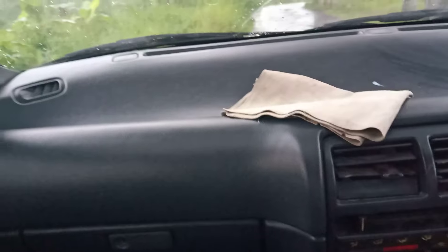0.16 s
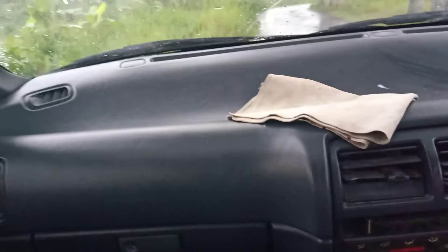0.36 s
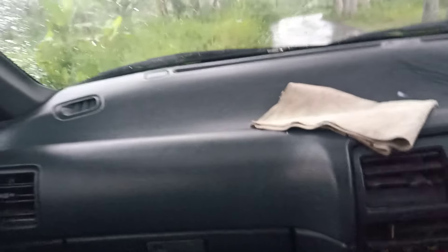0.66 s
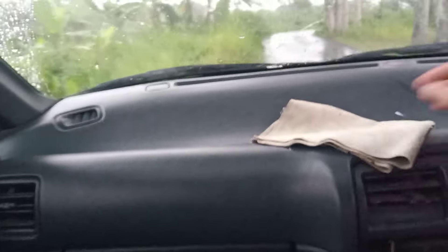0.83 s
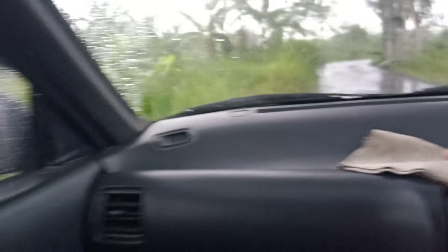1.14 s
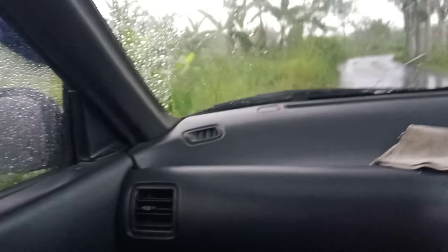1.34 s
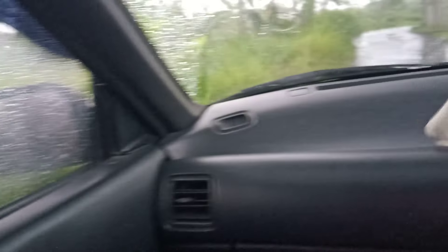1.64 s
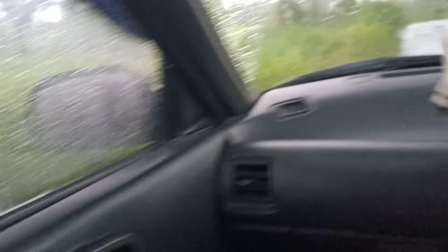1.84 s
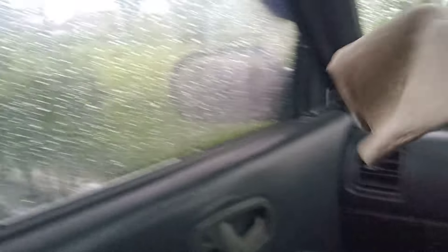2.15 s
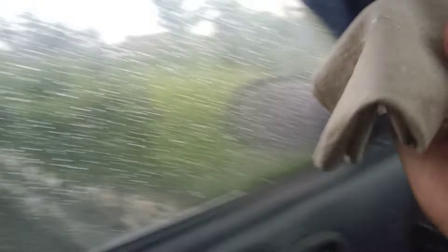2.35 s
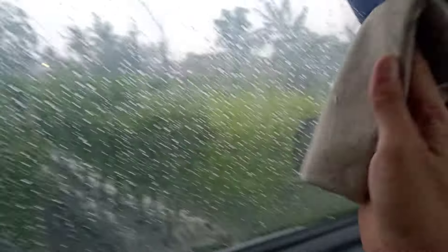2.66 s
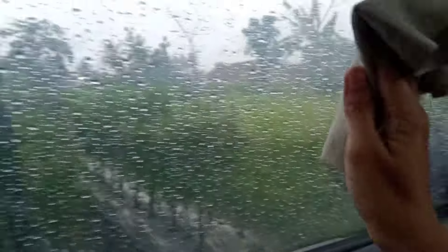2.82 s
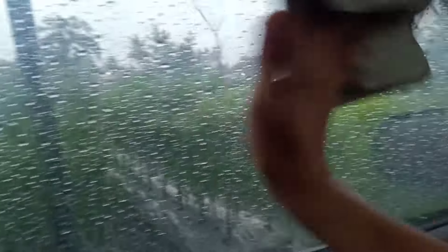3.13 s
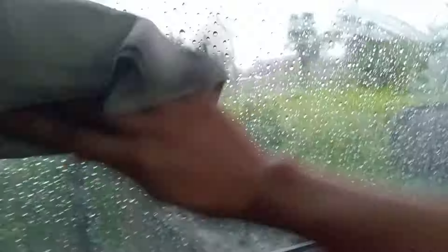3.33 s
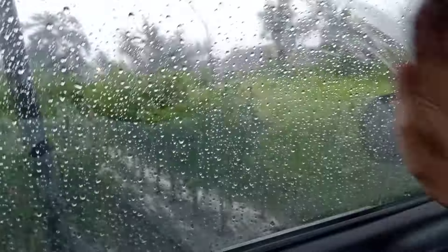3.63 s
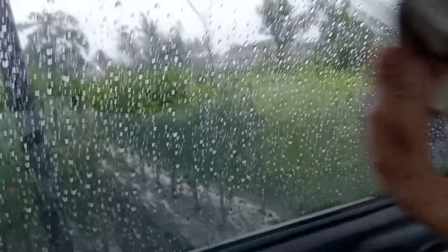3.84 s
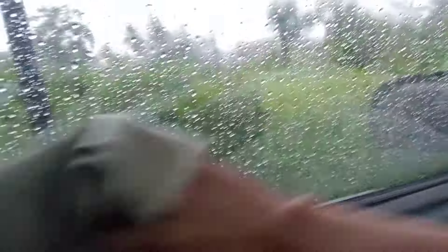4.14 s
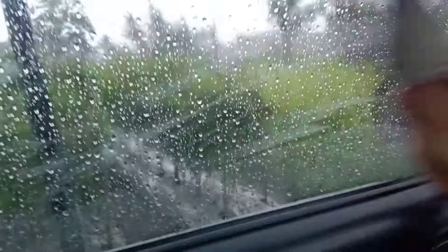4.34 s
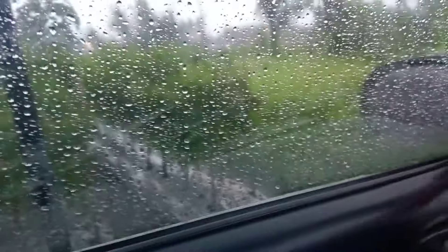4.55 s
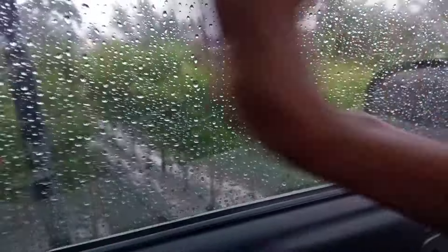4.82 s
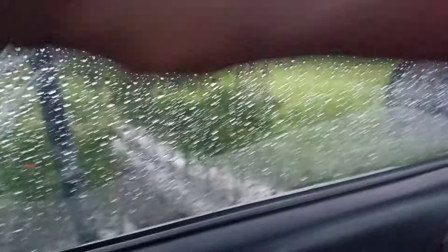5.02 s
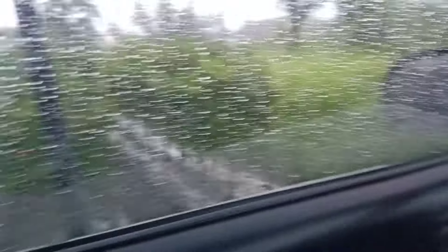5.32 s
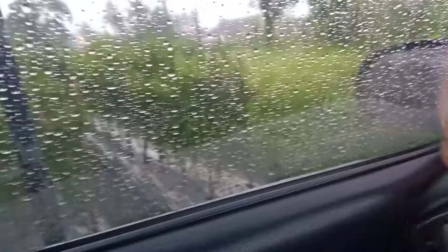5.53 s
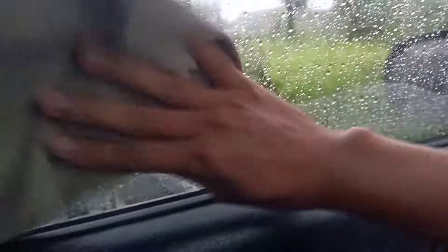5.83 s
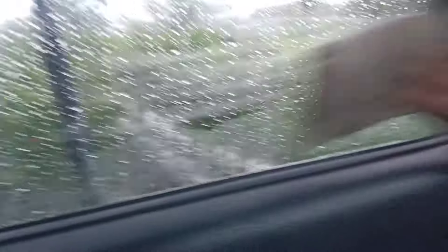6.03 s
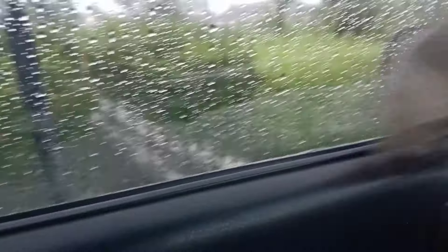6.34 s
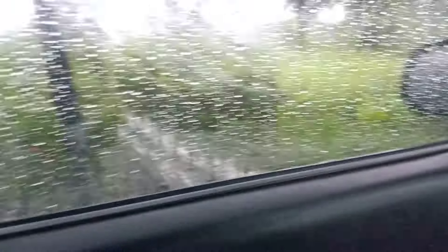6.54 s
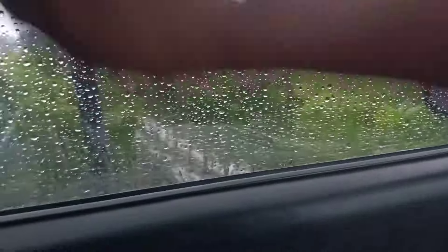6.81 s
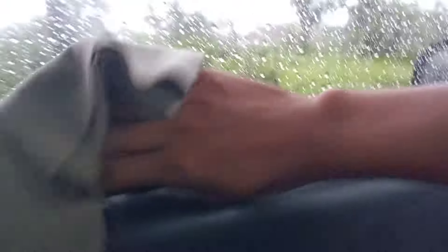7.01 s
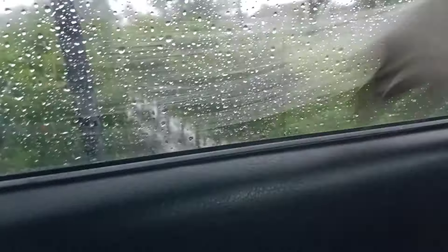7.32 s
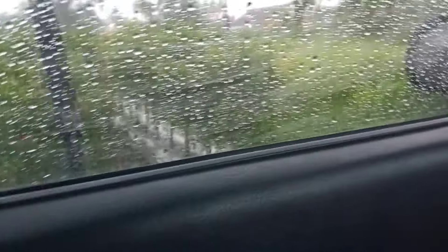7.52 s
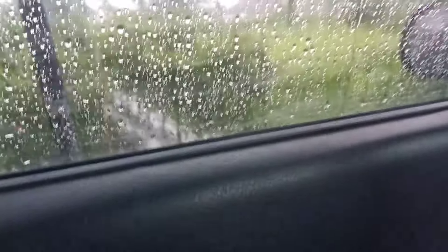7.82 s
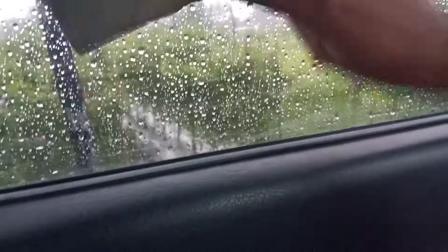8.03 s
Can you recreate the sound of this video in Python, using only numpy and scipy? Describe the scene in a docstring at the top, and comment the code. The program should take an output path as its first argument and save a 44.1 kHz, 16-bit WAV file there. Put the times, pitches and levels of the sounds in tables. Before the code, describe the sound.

Heavy rain patters densely on a parked car's roof and glass, big drops snapping over a low idling engine, while a cloth rubs and squeaks.

```python
"""Heavy rain on a parked car, heard in the cabin: a dense patter on roof and glass with single big drops on top.
The engine idles underneath as orders of its firing rate, sagging now and then.
A hand thuds and wipes with a cloth: shaped noise hisses and rubs, gliding fluttering tones squeak.
The rain is bursts of coloured noise; the microphone first faces the dash, then turns to the side window."""
import sys
import numpy as np
from scipy import signal
from scipy.fft import rfft, irfft, next_fast_len
from scipy.io import wavfile
from scipy.ndimage import uniform_filter1d, map_coordinates

SR = 44100
rng = np.random.default_rng(int(sys.argv[2]) if len(sys.argv) > 2 else 0)


def master_out(mix):
    """Clip the mix to full scale and print it as 16-bit PCM to the path in sys.argv[1]."""
    frames = np.transpose(np.atleast_2d(mix))
    ceiling = np.clip(frames, -1, 1)
    pcm = np.round(ceiling * 32767).astype(np.int16)
    wavfile.write(sys.argv[1], SR, pcm)


N = 360297

# low rumble of the body: (frequency [Hz], relative density [dB])
RUMBLE_SPECTRUM = [(13, -44), (22, -6.5), (54, -3), (92, 1.5), (139, 5), (158, 3.5), (243, -5),
                   (330, -11.5), (430, -68), (730, -120)]
# patter through roof lining and glass: (frequency [Hz], relative density [dB])
PANEL_SPECTRUM = [(260, -19), (450, -1.5), (712, -1.5), (1000, -4.5), (1110, -8.5), (1330, -7.5),
                  (2200, -14.5), (3000, -13.5), (3800, -19), (5670, -40.5), (10900, -54), (13600, -44),
                  (15600, -54)]
# treble of spray, drops and cloth: (frequency [Hz], relative density [dB])
TREBLE_SPECTRUM = [(3530, -21), (6000, -17), (6270, -5), (7440, -1.5), (10800, -12.5), (13600, -9),
                   (14700, -22), (15500, -14)]
# sags of the idle: (lowest point [s], depth [Hz])
IDLE_SAGS = [(.479, .785), (3.308, 2.82), (3.882, 1.55), (5.441, 3.52), (7.336, 1.35)]

TURN_S = (1.17, 3.3)  # the microphone turns from dash to side window between these
BAND_LIMIT_HZ = 15690


def amp(db):
    """Gain of a level in dB."""
    return 10 ** (np.asarray(db) / 20)


def unit(x):
    """x at rms 1 along its last axis."""
    return x / np.sqrt(np.mean(x ** 2, axis=-1, keepdims=True) + 1e-20)


def along(points, hz):
    """(Hz, dB) points on a log axis; -120 dB outside them."""
    f, v = np.transpose(points)
    return np.interp(np.log(hz + 1), np.log(f + 1), v, left=-120, right=-120)


def curves(rows):
    """One value per sample for each column after the time."""
    s, *cols = np.transpose(rows)
    return [np.interp(np.arange(N) / SR, s, c) for c in cols]


def wobble(rate_hz, size=N):
    """A smooth random curve, rate_hz knots a second."""
    coarse = np.arange(0, size + 16, 16)
    knots = rng.standard_normal(int(size * rate_hz / SR) + 4)
    smooth = map_coordinates(knots, [coarse * rate_hz / SR])
    return np.interp(np.arange(size), coarse, smooth)


def filtered(x, response):
    """x times a response of frequency."""
    m = next_fast_len(x.shape[-1] + 1024)
    return irfft(rfft(x, m) * response(np.fft.rfftfreq(m, 1 / SR)), m)[..., :x.shape[-1]]


def noise(spectrum, shape=N):
    """Coloured noise of rms 1."""
    return unit(filtered(rng.standard_normal(shape), lambda hz: amp(along(spectrum, hz))))


def bursts(times_s, gains, t60_s, rise_s):
    """An envelope: every strike rises fast and dies away; powers add."""
    t = np.arange(SR // 8) / SR
    strikes = np.bincount((times_s * SR).astype(int), gains ** 2, N)[:N]
    power = (amp(-60 * t / t60_s) * (1 - np.exp(-t / rise_s))) ** 2
    return np.sqrt(np.abs(signal.oaconvolve(strikes, power)[:N]))


def add_at(out, start_s, x):
    """Mix x into out from start_s on."""
    start = round(start_s * SR)
    out[start:start + len(x)] += x


def facing(pair_db):
    """A level that passes from its dash value to its window value as the microphone turns."""
    return np.interp(np.arange(N) / SR, TURN_S, pair_db)


def idle_rate():
    """Firing rate (Hz): steady, but each sag sinks linearly and recovers exponentially."""
    idle_hz, fall_s, recover_s = 27.654, .293, .32
    t = np.arange(N) / SR
    rate_hz = np.full(N, idle_hz)
    for s, depth_hz in IDLE_SAGS:
        sink = np.clip(1 + (t - s) / fall_s, 0, 1)
        recovery = np.exp(-np.abs(t - s) / recover_s)
        rate_hz -= depth_hz * np.where(t < s, sink, recovery)
    return rate_hz


def engine():
    """Orders of the firing rate boom in the cabin; the valve gear ticks once a firing; the body rumbles."""
    # weaker orders: (multiple of the firing rate, level [dB])
    weak_orders = [(3, -35), (4, -65), (6, -45), (7, -40)]
    # something in the valve gear pings: (time [s], level [dB])
    ping_rows = [(5.814, -46), (5.851, -53), (5.889, -56), (5.927, -49), (7.465, -55), (7.54, -49)]
    second_db, fifth_rest_db, rumble_db = (-28, -31.5), -32, (-29, -26.5)  # pairs: dash, window
    pull_s, pull_db, slack_db_per_hz_s = 0.24, 4.5, -0.23

    rate_hz = idle_rate()
    turns = np.cumsum(rate_hz) / SR
    # effort peaks pull_s after each sag and lifts the fifth order; sinking speed weakens it
    after = np.clip(np.arange(N) / SR - np.array(IDLE_SAGS)[:, :1], 0, None) / pull_s
    effort = (after * np.exp(1 - after)).sum(axis=0)
    sinking_hz_s = uniform_filter1d(np.clip(-np.gradient(rate_hz) * SR, 0, None), size=2000)
    fifth_db = fifth_rest_db + pull_db * effort + slack_db_per_hz_s * sinking_hz_s

    def order(k, db, waver_db):
        level = np.sqrt(2) * amp(db + waver_db * wobble(9))
        return level * np.sin(2 * np.pi * (k * turns + 0.054 * wobble(6)))

    boom = order(2, facing(second_db), 0.38) + order(5, fifth_db, 0.63)
    boom += sum(order(k, db, 2.8) for k, db in weak_orders)

    firings_s = np.flatnonzero(np.diff(np.floor(turns + 0.88))) / SR
    beat = bursts(firings_s, amp(2 * rng.standard_normal(len(firings_s))), t60_s=.04, rise_s=.0015)
    tick_spectrum = [(5000, -30), (7500, -4), (8800, -9), (10100, 0), (11200, -10), (15000, -16)]
    tick = amp(-62) * beat * noise(tick_spectrum)

    ping_s, ping_db = np.transpose(ping_rows)
    ping_spectrum = [(5000, -15), (8600, -14), (9000, 2), (9400, -16), (14000, -18)]
    ping = bursts(ping_s, amp(ping_db), t60_s=0.035, rise_s=0.0013) * noise(ping_spectrum)

    rumble = amp(facing(rumble_db) + 1.25 * wobble(24)) * noise(RUMBLE_SPECTRUM)
    return boom + tick + ping + rumble


def patter():
    """Countless small drops: a far wash, near short bursts with spray, and the drumming roof panel."""
    # roof drumming: (frequency [Hz], relative density [dB])
    roof_spectrum = [(200, -26.5), (300, -3.5), (380, 4), (480, -2.5), (650, -6.5)]
    # roof drumming about its base level: (time [s], level [dB])
    roof_swell = [(0, -0.5), (.55, -2), (1.2, 0.5), (1.9, 1), (2.75, -1), (3.05, 6), (3.3, 2.5), (4.5, 1),
                  (5.3, 0), (6.5, 2), (8.17, -1)]
    # small drops ring their spot of panel around one of these: frequency [Hz]
    spots_hz = [603, 1150, 2100, 3440, 4570]
    roof_db, patter_db, spray_db = (-34, -42.5), (-36.5, -35), (-74.5, -71.5)  # dash, window

    near = np.zeros(N)
    for hz in spots_hz:
        when, luck = rng.random((2, 600))
        gains = amp(-20 * luck ** 1.36)
        colour = noise([(hz * 0.24, -22), (hz * 0.54, -6), (hz, 0), (hz * 1.24, -6), (21000, -14)])
        near += bursts(when * N / SR, gains, t60_s=0.052, rise_s=0.00044) * colour

    when, luck = rng.random((2, 2500))  # the smallest drops only tick
    tiny = bursts(when * N / SR, amp(-22 * luck ** 0.55), t60_s=0.0073, rise_s=0.0003)
    near += amp(-7.0) * tiny * noise([(600, -15), (2500, -2), (21000, -1)])

    when, luck = rng.random((2, 900))  # hard drops: one sharp broadband tap
    taps = np.bincount((when * N).astype(int), amp(-24 * luck ** .7), N)
    near += amp(6) * filtered(taps, lambda hz: hz / (hz + 900))
    near = unit(filtered(near, lambda hz: amp(along(PANEL_SPECTRUM, hz))))

    wash = amp(-6.0 + 2.6 * wobble(35)) * noise(PANEL_SPECTRUM)
    roof_level_db = facing(roof_db) + curves(roof_swell)[0] + 1.17 * wobble(20)
    roof = amp(roof_level_db) * noise(roof_spectrum)
    # spray flies up with the near drops
    near_envelope = np.sqrt(np.abs(uniform_filter1d(near ** 2, size=200)))
    spray = amp(facing(spray_db) + 2.1 * wobble(30)) * noise(TREBLE_SPECTRUM)
    spray *= unit(.6 + near_envelope)
    return roof + spray + amp(facing(patter_db)) * (wash + amp(-2.0) * near)


def big_drops():
    """Each big drop splats on its own spot of panel: a ragged burst of noise whose treble dies first."""
    # (time [s], level [dB], dull share [dB], length scale [s])
    placed = [(0.03, -23.5, 1, 0.029), (0.151, -31, 4, 0.032), (0.2115, -27, 3.5, 0.03),
              (.303, -31, -7, 0.011), (0.5531, -28.5, 3, 0.029), (.601, -33.5, 0, 0.028),
              (.766, -34, 3, 0.017), (0.9766, -30.5, 5.5, 0.024), (1.018, -27, 6.5, 0.015),
              (1.034, -29, 5, 0.038), (1.151, -27, -12, 0.012), (1.179, -26.5, 1.5, 0.021),
              (1.2177, -24.5, 0, 0.023), (1.262, -30, -16, 0.023), (1.3438, -34, 5.5, 0.026),
              (1.427, -36, -1, 0.012), (1.506, -25.5, -1.5, 0.022), (1.523, -30, 8, 0.025),
              (1.722, -21.5, 0, 0.011), (1.751, -30, -11, .01), (1.821, -37, 1.5, 0.047),
              (2.034, -26, -4.5, 0.01), (2.064, -27, -10, 0.013), (2.136, -25.5, 1.5, 0.0067),
              (2.285, -38, 4, 0.021), (2.392, -25, -2.5, 0.011), (2.5152, -19, -18, 0.01),
              (2.547, -29.5, 3, 0.011), (2.7053, -26.5, -1.5, 0.023), (2.799, -30, 7, 0.04),
              (2.9, -28, 4, 0.031), (2.939, -31.5, -1, 0.043), (2.9855, -28, -2.5, 0.04),
              (3.096, -27.5, 4.5, 0.029), (3.133, -30.5, 7.5, 0.078), (3.438, -30.5, -0.5, 0.086),
              (3.492, -26, -1.5, 0.023), (3.554, -20, 1, 0.019), (3.65, -26, -11, 0.012),
              (3.666, -21.5, -7, 0.0087), (3.7222, -29.5, -23, 0.02), (3.7753, -21.5, -2, 0.017),
              (3.8005, -15, -6, 0.013), (3.911, -30, 2, 0.011), (3.982, -27.5, -6, 0.02),
              (4.053, -31, -5, 0.013), (4.127, -24.5, -13, 0.011), (4.0246, -25.5, 3, 0.019),
              (4.2073, -26, 1, 0.051), (4.38, -34, 7, 0.018), (4.406, -28.5, -5, 0.021),
              (4.5463, -36, -10, 0.21), (4.586, -26, 0, 0.037), (4.597, -20.5, -9.5, 0.033),
              (4.764, -23.5, -12, 0.02), (4.832, -34.5, -7, 0.047), (4.8514, -30, 4.5, 0.026),
              (4.9356, -31, 1.5, 0.029), (4.998, -31, -8, 0.013), (5.0145, -19.5, -8, 0.011),
              (5.027, -25, 5, 0.027), (5.184, -35, 8, 0.046), (5.222, -32, -4, 0.015),
              (5.283, -36, 9, 0.02), (5.3183, -32, 5, 0.041), (5.372, -31, -10, 0.013),
              (5.388, -30, 0, 0.043), (5.464, -25, -6, 0.026), (5.4863, -25, -1.5, 0.037),
              (5.535, -24.5, -4, 0.021), (5.5787, -28, -14, 0.015), (5.593, -28, -15, 0.019),
              (5.616, -31, -8, 0.016), (5.646, -26, -1, 0.013), (5.708, -27, -11, 0.018),
              (5.774, -29, -21, 0.029), (5.8437, -25.5, -3, 0.026), (5.885, -24.5, 2, 0.052),
              (5.956, -26, -2, 0.026), (5.969, -25, -3, 0.01), (6.092, -28.5, 3.5, 0.024),
              (6.2407, -28.5, -1, 0.051), (6.2886, -28.5, -2, 0.018), (6.312, -30.5, -1, 0.028),
              (6.384, -30.5, 7.5, 0.025), (6.478, -31, 0, 0.016), (6.526, -30, -16, 0.013),
              (6.541, -29.5, 8.5, 0.038), (6.6145, -33.5, 2.5, 0.081), (6.632, -33, -9, 0.016),
              (6.67, -35.5, 8, 0.04), (6.741, -32, 6.5, 0.018), (6.864, -26.5, 2, 0.027),
              (6.9015, -33, 6.5, 0.051), (6.98, -26.5, 2, 0.013), (6.9965, -26.5, -0.5, 0.03),
              (7.0505, -25.5, -2.5, 0.015), (7.136, -24.5, -5, 0.012), (7.1937, -34, 3, 0.03),
              (7.221, -23.5, -8, 0.011), (7.3123, -26, -7, 0.02), (7.361, -27.5, 3.5, 0.0092),
              (7.411, -29, 2.5, 0.017), (7.425, -26.5, 1.5, 0.028), (7.477, -27.5, -6, 0.012),
              (7.536, -32.5, -21, 0.046), (7.5675, -10, -9, 0.0047), (7.573, -16.5, -7, 0.0094),
              (7.6265, -35, 0, 0.15), (7.6969, -27, -1, 0.018), (7.7972, -28.5, 1.5, 0.049),
              (7.877, -26.5, -10, 0.01), (7.91, -18.5, -24, 0.0054), (8.0303, -30, 4.5, 0.02),
              (8.062, -24, -0.5, 0.027), (8.1116, -21.5, -28, 0.016)]
    # splat: (frequency [Hz], relative density [dB])
    splat_spectrum = [(200, 4), (400, 3.5), (700, 8), (1300, 3), (2000, -5), (3300, -4), (4200, -14),
                      (4800, -23), (5500, -31.5), (7000, -41)]
    bright_db = facing((-33.5, -31))

    out, t = np.zeros(N + SR), np.arange(SR // 8) / SR
    when = rng.uniform(0.0083, N / SR, size=14)
    luck = rng.standard_normal(size=(14, 3))
    # lesser drops in between fall at random
    lesser = [(s, -31.5 + 5.5 * a, -5.5 + 5 * b, 0.013 * amp(2.0 * c))
              for s, (a, b, c) in zip(when, luck)]
    all_drops = placed + lesser
    count = len(all_drops)
    shape = (count, len(t))

    def coloured_by_spot(x, step_hz, points):
        """Give each drop's spot its own random response."""
        spot_db = 2.8 * rng.standard_normal((count, points))
        return unit(filtered(x, lambda hz: amp(
            [np.interp(hz / step_hz, np.arange(points), row) for row in spot_db])))

    low = [p for p in splat_spectrum if p[0] < 1500] + [(1800, -7.5), (3200, -16.5)]
    high = [(1200, 1), (1600, -3.5)] + [p for p in splat_spectrum if p[0] > 1500]
    dull = coloured_by_spot(noise(low, shape), 150, 14)
    middle = coloured_by_spot(noise(high, shape), 450, 16)
    bright = noise(TREBLE_SPECTRUM, shape) * amp(2.9 * rng.standard_normal((count, 1)))
    ragged = amp(1.0 * noise([(20, -7.0), (150, -7.5), (300, -40.0)], shape))
    crack = 1 + 0.61 * amp(-60 * t / 0.0077)  # the first contact is the sharpest

    def fade(length_s, stretch, rise_s):
        decay = np.exp(-(t / (max(length_s, .003) * stretch)) ** 1.15)
        return decay * (1 - np.exp(-t / rise_s))

    for k, (s, db, dull_db, length_s) in enumerate(all_drops):
        splat = crack * middle[k] * fade(length_s, 0.61, 0.0032)
        splat += amp(dull_db) * dull[k] * fade(length_s, 1.39, 0.0021)
        splat += amp(bright_db[int(s * SR)]) * bright[k] * fade(length_s, 0.47, 0.00085)
        add_at(out, s - .0015, amp(db) * ragged[k] * splat)
    return out[:N]


def facing_window(x):
    """The rain as the turning microphone hears it: cabin resonances change level with the turn."""
    # (centre [Hz], width [Hz], dash level [dB], window level [dB])
    resonances = [(715, 150, -4.5, 0.5), (1170, 230, -0.5, -2.5), (1890, 180, 1.5, 0.5),
                  (4960, 1100, -1, 0)]
    out = x.copy()
    for centre_hz, width_hz, *pair_db in resonances:
        band = filtered(x, lambda hz: np.exp(-((hz - centre_hz) / width_hz) ** 2))
        out += (amp(facing(pair_db)) - 1) * band
    return out


def snaps():
    """A hard drop flicks the panel: one or two cycles at the pitch of its spot."""
    # (time [s], level [dB], frequency [Hz])
    snap_rows = [(.031, -17, 1600), (1.021, -13, 1300), (1.152, -22, 3600), (3.1763, -23, 3000),
                 (3.7226, -20, 3500), (3.802, -12, 2200), (3.809, -9, 1100), (3.9127, -20, 3000),
                 (4.2369, -16, 2800), (4.4109, -18, 3300), (4.598, -17, 4000), (5.0158, -11, 3600),
                 (5.027, -13, 1300), (6.0946, -18, 3200), (6.866, -13, 900), (7.137, -17, 3200),
                 (7.5752, -8, 1300), (7.6995, -19, 3200), (8.1359, -22, 3200)]
    decay_cycles = 1.2  # to about a third
    out, t = np.zeros(N + SR), np.arange(SR // 50) / SR
    for s, db, hz in snap_rows:
        envelope = np.exp(-t * hz / decay_cycles) * (1 - np.exp(-t * hz * 3))
        add_at(out, s - .5 / hz, 2 * amp(db) * envelope * np.sin(2 * np.pi * hz * t))
    return filtered(out[:N], lambda hz: 1 / (1 + (hz / 5000) ** 8))  # the lining swallows the treble


def ticks():
    """Fine spray ticks on the glass close to the microphone: decaying bursts of treble noise."""
    # (time [s], level [dB], t60 [s])
    tick_rows = [(.303, -55, .03), (1.138, -52, 0.027), (1.404, -60, .03), (2.798, -40.5, 0.036),
                 (3.2036, -51, .03), (4.2358, -56, .03), (4.347, -39, 0.026), (4.4079, -55, .03),
                 (4.597, -48, 0.12), (4.829, -56, 0.05), (5.0916, -47, 0.012), (5.466, -50, 0.037),
                 (5.692, -54, 0.044), (5.776, -51, .05), (6.44, -53, .03), (7.0808, -55, .03),
                 (7.1337, -54, 0.028), (7.3098, -50, .033), (7.57, -52, .03), (7.666, -43, 0.024),
                 (7.681, -47, 0.013)]
    level, t = np.zeros(N + SR), np.arange(SR // 8) / SR
    for s, db, t60_s in tick_rows:
        add_at(level, s - .001, amp(db - 60 * t / t60_s) * (1 - np.exp(-t / 0.0013)))
    return level[:N] * noise([(3500, -15), (5500, -9), (7500, 3), (9000, 2.5), (13000, -4), (15700, -4)])


def cloth():
    """The cloth hisses and rubs; where it grips wet glass, fast fluttering slips squeak with overtones."""
    # lifted from the dash, then wiped over the glass: (middle [s], length [s], hiss [dB], rub [dB])
    strokes = [(1.154, 1, -86, -44.5), (3.033, 0.27, -75, -42), (3.627, 0.11, -60, -31),
               (3.94, 0.67, -67, -30.5), (4.747, 0.26, -76, -38), (4.85, .07, -63, -56),
               (5.463, 0.31, -63, -36.5), (5.81, 0.89, -80, -37.5), (6.74, 0.2, -83, -48),
               (7.18, 0.41, -72, -36.5), (7.64, 0.55, -71, -42.5)]
    # (start [s], length [s], first pitch [Hz], last pitch [Hz], level [dB],
    #  flutter [share of pitch], overtone level [dB])
    squeaks = [(3.546, .048, 3280, 3790, -27.5, .013, -27), (3.586, .018, 3850, 4100, -39, .014, -20),
               (3.598, .03, 3850, 3930, -49, .03, -8), (3.652, .022, 5350, 5320, -48, .008, -28),
               (3.828, .018, 3900, 3900, -51, .02, -10), (3.845, .17, 3280, 3350, -50, .03, -13),
               (3.855, .09, 3550, 3700, -50, .045, -10), (3.915, .18, 3930, 3830, -45, .018, -22)]
    grip_shape, glide_shape = .8, .7  # exponents: arched swell; pitch moves fastest at first
    door_db = 0.5  # a stroke also shakes the door: rumble relative to rub

    clock = np.arange(N) / SR
    swells = np.array([np.cos(np.pi * np.clip((clock - s) / length_s, -.5, .5))
                       for s, length_s, *_ in strokes])
    hiss, rub = amp(np.array(strokes)[:, 2:].T) @ swells
    when, luck = rng.random((2, 450))  # the damp cloth judders: short slips at random moments
    slips = bursts(when * N / SR, amp(-14 * luck), t60_s=0.022, rise_s=0.0019)
    judder = unit(0.37 + slips)
    out = hiss * unit(.8 + judder) * amp(2.3 * wobble(40)) * noise(TREBLE_SPECTRUM)
    rubbing = noise(PANEL_SPECTRUM) + amp(door_db) * noise(RUMBLE_SPECTRUM)
    out += rub * judder * amp(3.6 * wobble(30)) * rubbing

    for s, length_s, first_hz, last_hz, db, flutter, overtone_db in squeaks:
        t = np.arange(0, length_s, 1 / SR)
        hz = first_hz + (last_hz - first_hz) * (t / length_s) ** glide_shape
        grip = np.abs(np.sin(np.pi * t / length_s)) ** grip_shape
        phase = 2 * np.pi * np.cumsum(hz * (1 + flutter * wobble(658, size=len(t)))) / SR
        overtones = np.sin(2 * phase) + amp(-15) * np.sin(3 * phase)
        tone = np.sin(phase) + amp(overtone_db) * overtones
        level = np.sqrt(2) * amp(db + 2.5 * wobble(150, size=len(t)))
        add_at(out, s, grip * level * tone)
    return out


def thuds():
    """The padded hand lands on dash or glass: a short low ring of the panel under it."""
    # (time [s], level [dB], frequency [Hz], t60 [s])
    thud_rows = [(1.293, -12, 384, 0.13), (2.941, -14.5, 227, 0.15), (2.979, -6, 202, 0.073),
                 (3.13, -9, 177, 0.086), (3.76, -12.5, 330, 0.085), (3.793, -7.5, 208, 0.11),
                 (3.811, -10, 201, 0.16), (3.862, -18, 206.6, 0.65), (3.94, -16.5, 730, 0.17),
                 (5.886, -14, 224, 0.14)]
    out, t = np.zeros(N + SR), np.arange(SR // 4) / SR
    for s, db, hz, t60_s in thud_rows:
        body = noise([(hz * 0.38, -14), (hz, 0), (hz * 2.3, -18)], len(t))
        ring = 0.6 * body + 0.66 * np.sin(2 * np.pi * hz * t)
        envelope = amp(db - 60 * t / t60_s) * (1 - np.exp(-t / 0.0037))
        add_at(out, s - .004, envelope * ring)
    return out[:N]


def scene():
    """Everything in the cabin, at one microphone."""
    rain = facing_window(patter() + big_drops())
    return (engine() + rain + snaps() + ticks() + cloth() + thuds())[None]


def record(dry):
    """The recorder keeps nothing above its band limit."""
    return filtered(dry, lambda hz: hz < BAND_LIMIT_HZ)


dry = scene()
out = record(dry)
master_out(out)
```